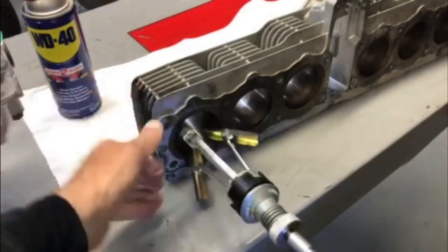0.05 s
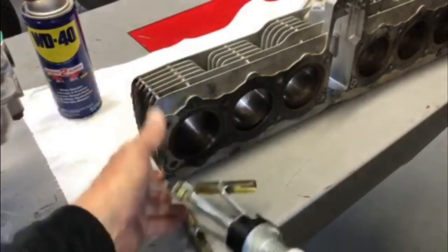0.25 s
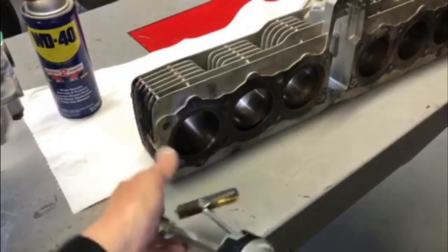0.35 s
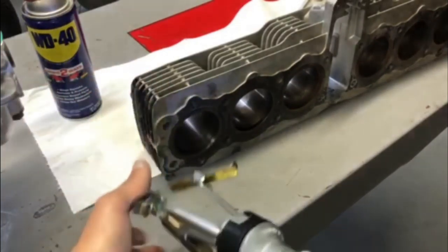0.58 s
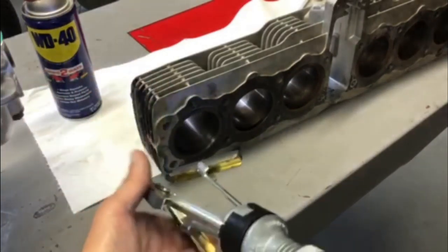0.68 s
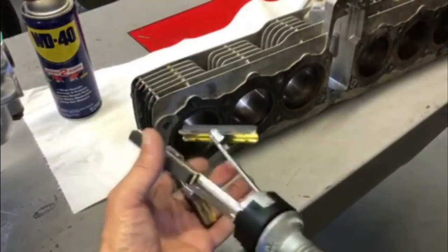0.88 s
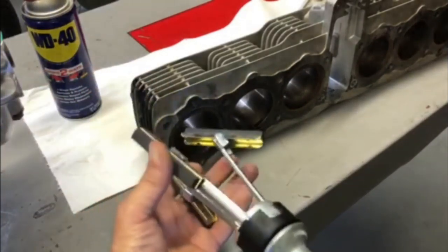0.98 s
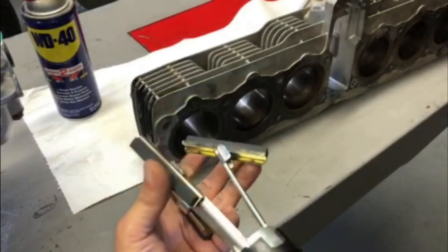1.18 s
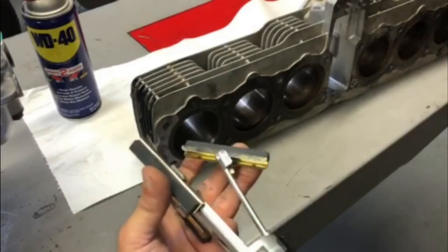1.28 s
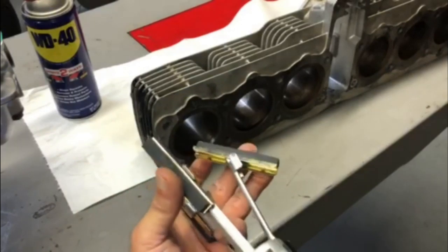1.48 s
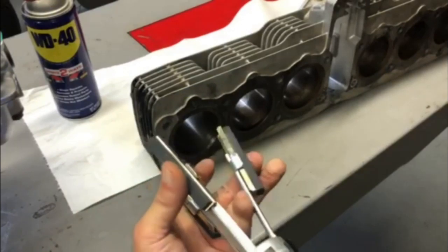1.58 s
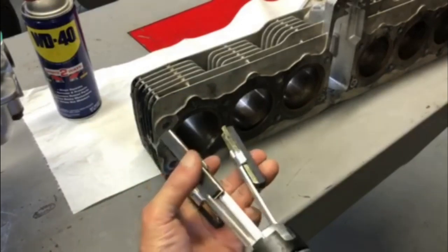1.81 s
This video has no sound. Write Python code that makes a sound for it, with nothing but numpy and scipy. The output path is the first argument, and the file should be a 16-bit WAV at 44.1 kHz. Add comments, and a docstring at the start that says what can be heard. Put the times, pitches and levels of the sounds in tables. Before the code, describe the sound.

Cylinder hone pulled from an engine block: short gritty scrape, quick knocks, one sharp ringing snap, then scattered light metal clicks and a late bright clack as a hand squeezes it, heard close in a hard-walled garage.

```python
"""In a garage, a three-armed cylinder hone is drawn out of an engine block. Its stones scrape (grainy noise
plus the bore's hollow tone), catch on the rim, and the spring snaps the arms open (bursts plus ringing metal).
A hand then squeezes them shut: the stone holders rattle (swells of grainy noise), tick on their pivots
and clack together. The ceiling and hard walls answer with a bounce and a fading tail of noise.
Underneath lie a low rumble, soft hiss and mains hum."""
import sys
import numpy as np
from scipy import signal
from scipy.fft import rfft, irfft, next_fast_len
from scipy.io import wavfile
from scipy.ndimage import uniform_filter1d

SR = 44100
rng = np.random.default_rng(int(sys.argv[2]) if len(sys.argv) > 2 else 0)


def int16_out(signal):
    """Quantize to a 16-bit WAV file."""
    q = np.round(np.clip(np.atleast_2d(signal).T, -1, 1) * 32767)
    wavfile.write(sys.argv[1], SR, q.astype(np.int16))


N = 81585  # length in samples

# Sliding out of the bore. Each row: time in seconds, level in dB before the final trim.
SLIDE_LEVEL = [(0, -67), (.045, -71), (.08, -60.5), (.11, -57), (.14, -51.5), (.165, -60), (.19, -78),
               (.22, -81.5)]
# Colour of stone on iron. Each row: pitch in Hz, relative strength in dB per Hz.
GRIT_COLOUR = [(200, -6.5), (600, 1), (1000, -1), (1400, -4.5), (2400, -7.5), (3500, -2.5), (4300, -13),
               (5400, 0), (7000, -8), (9700, -2), (10800, -15.5), (15500, -17.5)]
# Resonances of the air in the bore. Each row: pitch in Hz, width in Hz, relative strength in dB.
BORE_RESONANCES = [(750.7, 9, 7.5), (866, 95, -4.5), (927, 16, -11.5), (1474, 75, -14.5)]


def scrape(wet_db=-3):
    """Gritty stones slide along the bore and make the air inside it resonate."""
    t = np.arange(N) / SR
    level = amp(np.interp(t, *np.transpose(SLIDE_LEVEL), right=-120))
    loudest = level.max()

    def bore_response(f):
        response = 0
        for centre, width, db in BORE_RESONANCES:
            damping = 1j * f * width
            response = response + amp(db) * damping / (centre * centre - f * f + damping)
        return response

    air = unit(filtered(rng.standard_normal(N), bore_response))
    # a power below 1: the hollow tone swells less than the grit
    hollow = amp(-7) * loudest * (level / loudest) ** 0.56 * air
    still_sliding = t < SLIDE_LEVEL[-1][0]
    rub = level * grainy(GRIT_COLOUR, grain_db=2.5) + hollow * still_sliding
    return garage(rub, rub, wet_db) * amp(-2.5)


# Stones catch on the rim. Each row: start in seconds, level in dB before the final trim.
RIM_KNOCKS = [(.1948, -45.5), (.199, -43.5), (.207, -49.5), (.2165, -40.5)]
# Colour of a knock. Each row: pitch in Hz, relative strength in dB per Hz.
KNOCK_COLOUR = [(150, -26), (500, -12), (950, 3), (1300, -3), (1650, -12), (2300, -6), (3800, -10),
                (5000, -17), (9000, -18), (11000, -28), (16000, -34)]
# Ringing of the block. Each row: pitch in Hz, relative level in dB, seconds to fade by 60 dB.
BLOCK_MODES = [(895, -11, 0.3), (1100, -17.5, 0.31), (8990, -10.5, 0.34)]


def rim_knocks():
    """The stones trip over the rim, and each catch sets the block ringing."""
    knocks = strikes(RIM_KNOCKS, KNOCK_COLOUR, BLOCK_MODES,
                     hold_s=0.0013, release_s=.003, ring_db=-2, wet_db=-6)
    return amp(0.5) * knocks


# The arms hit their stop. Each row: start in seconds, level in dB.
ARM_SNAPS = [(.2214, -24), (.2275, -34.5)]
# Colour of a snap. Each row: pitch in Hz, relative strength in dB per Hz.
SNAP_COLOUR = [(100, -27.5), (250, -20.5), (500, -11.5), (900, -9), (1300, -2), (1750, -5.5), (2400, 1.5),
               (3400, 3.5), (4200, 1.5), (5800, 0), (7700, -2), (8700, -4), (9400, 0), (10000, -5.5),
               (10700, -15.5), (12600, -16.5), (16000, -26)]
# Ringing of the sprung frame. Each row: pitch in Hz, relative level in dB, seconds to fade by 60 dB.
FRAME_MODES = [(514, -33, .45), (902, -27, .3), (1078, -28, .4), (1307, -26, .45), (1378, -27, .5),
               (1723, -30, .4), (2213, -28, .4), (3335, -17, .2), (3470, -19, .18), (4368, -27, .3),
               (4712, -26, .3), (5180, -24, .3), (5625, -24, .28), (9228, -7, .08), (9340, 7, .012)]


def spring_open():
    """The spring throws the arms out against their stop, and the frame rings."""
    return strikes(ARM_SNAPS, SNAP_COLOUR, FRAME_MODES,
                   hold_s=0.0018, release_s=0.0021, ring_db=-7, wet_db=1.5)


# Loose holders jingle. Each row: middle in seconds, half length in seconds, level in dB.
RATTLE_SWELLS = [(.052, 0.0025, -59.5), (0.473, 0.0081, -52), (0.652, 0.03, -64), (0.674, 0.006, -60),
                 (0.81, 0.0097, -67), (0.846, 0.0052, -59), (1.579, 0.0077, -63)]
# Colour of the jingle. Each row: pitch in Hz, relative strength in dB per Hz.
RATTLE_COLOUR = [(500, -7.5), (2400, -9.5), (3200, -4.5), (4300, -7), (6000, -3.5), (7800, -9.5), (8800, 7),
                 (10200, -16.5), (12000, -17), (13800, -17), (16000, -23)]


def rattles(wet_db=-3):
    """The loose holders slide on their pins in short, soft swells of grainy noise."""
    t = np.arange(N) / SR
    swell = np.zeros(N)
    for middle, half, db in RATTLE_SWELLS:
        swell += amp(db) * np.exp(-((t - middle) / half) ** 2)
    jingle = swell * grainy(RATTLE_COLOUR, grain_db=6)
    return garage(jingle, jingle, wet_db)


# Stone holders knock on their pivots. Each row: start in seconds, level in dB before the final trim.
PIVOT_TICKS = [(.4673, -54), (.7412, -48.5), (.8498, -33), (1.0125, -45), (1.2265, -58), (1.536, -49)]
# Colour of a tick. Each row: pitch in Hz, relative strength in dB per Hz.
TICK_COLOUR = [(100, -42), (400, -33), (700, -20), (1300, -13), (1900, -21), (3000, -14), (3550, -3),
               (4100, -7), (6000, -1), (8000, -1), (9500, 0), (10500, -4), (12000, -14), (13700, -11),
               (16000, -19)]
# Ringing of a holder. Each row: pitch in Hz, relative level in dB, seconds to fade by 60 dB.
HOLDER_MODES = [(3510, 9, .015), (3580, -30, .2), (5523, -21, .25), (5992, -20, .25), (8840, -12, .17),
                (8950, -13, .28), (9150, -15, .15), (9550, -1, .018), (10440, -15, .14), (10760, -22, .2),
                (13550, -23, .14)]


def pivot_ticks():
    """Loose holders knock on their pivots and ring."""
    ticks = strikes(PIVOT_TICKS, TICK_COLOUR, HOLDER_MODES,
                    hold_s=0.0019, release_s=0.0038, ring_db=-3.5, wet_db=-7.0)
    return amp(-5) * ticks


# The stones close on each other. Each row: start in seconds, level in dB before the final trim.
STONE_CLACKS = [(1.5873, -27.5)]
# Colour of a clack. Each row: pitch in Hz, relative strength in dB per Hz.
CLACK_COLOUR = [(100, -38), (300, -25), (800, -16), (2000, -22), (2600, -17), (3600, -2), (4600, -11),
                (5500, 2), (7000, 0), (8500, 2), (9200, -10), (10600, -3), (12200, -9), (13000, -17),
                (16000, -20)]
# Ringing of a stone in its shoe. Each row: pitch in Hz, relative level in dB, seconds to fade by 60 dB.
STONE_MODES = [(2900, -29, .3), (3080, -27, .25), (5400, -22, .4), (5534, -22, .36), (5970, -21, .55),
               (6130, -22, .45), (6928, -22, .25), (8380, -5, .025), (8603, -22, .25), (10630, -27, .22),
               (12190, -25, .14)]


def stones_clack():
    """The stones clack shut and ring in their shoes."""
    clacks = strikes(STONE_CLACKS, CLACK_COLOUR, STONE_MODES,
                     hold_s=0.003, release_s=0.00092, ring_db=-1.5, wet_db=-7.5)
    return amp(-5) * clacks


def strikes(rows, colour, modes, hold_s, release_s, ring_db, wet_db):
    """Each contact is a brief metallic chatter that leaves the part's modes ringing."""
    out = np.zeros(N)
    t = np.arange(SR // 2) / SR
    click = causal(colour)
    # full force while held, then a quick fade
    contact = np.exp(-np.maximum(t - hold_s, 0) / release_s)
    force = np.linalg.norm(contact)
    for start, db in rows:
        chatter = rng.choice([-1, 1], len(t)) * contact
        ring = amp(ring_db) * ringing(modes, t)
        direct = signal.fftconvolve(chatter, click)[:len(t)] + ring
        # the room tail is fed by one click as strong as the whole chatter
        spread = force * np.pad(click, (0, len(t) - len(click))) + ring
        before = round(start * SR)
        direct = np.pad(direct, (before, N))[:N]
        spread = np.pad(spread, (before, N))[:N]
        out += amp(db) * garage(direct, spread, wet_db)
    return out


def ringing(modes, t):
    """Loose joints make each fading ring waver in pitch."""
    spread_hz_per_khz, changes_per_s = 11, 330
    out = np.zeros(len(t))
    for hz, db, t60 in modes:
        knots = rng.standard_normal(size=1024)
        waver = np.interp(t * changes_per_s, np.arange(len(knots)), knots)
        pitch = hz + spread_hz_per_khz * hz / 1000 * waver
        turns = np.cumsum(pitch) / SR + rng.random()
        out += amp(db - 60 * t / t60) * np.sin(2 * np.pi * turns)
    return out * (1 - np.exp(-t / 0.00021))  # soft start, in seconds


# How long the garage rings. Each row: pitch in Hz, seconds to fade by 60 dB.
ROOM_FADE = [(200, 0.91), (1200, 0.7543), (3500, 0.6948), (6000, 0.7043), (9000, .5), (14000, 0.48)]
# Colour of its tail. Each row: pitch in Hz, relative strength in dB.
ROOM_COLOUR = [(200, 10), (1200, 3), (3000, -2), (6000, 0.5), (9000, -2.5), (14000, 1.5)]


def garage(x, spread, wet_db):
    """The direct sound x, its bounce off the ceiling, and a diffuse tail fed by what spreads in all directions."""
    build_s, ceiling_s, ceiling_db = 0.0013, .0172, -11.5
    hz, t, z = signal.stft(rng.standard_normal(SR), SR, nperseg=256)
    fade = amp(-60 * t / along(ROOM_FADE, hz)[:, None])
    tail = signal.istft(z * fade, SR, nperseg=256)[1]
    tail *= 1 - np.exp(-np.arange(len(tail)) / SR / build_s)
    wash = signal.fftconvolve(spread, tail / np.linalg.norm(tail))[:N]
    wash = filtered(wash, lambda f: amp(1.5 + wet_db + along(ROOM_COLOUR, f)))
    # turning the phase with pitch delays the bounce
    bounce = filtered(x, lambda f: amp(ceiling_db) * np.exp(-2j * np.pi * f * ceiling_s))
    return x + wash + bounce


# Rumble while the tool is pulled out. Each row: time in seconds, level in dB (the last level stays).
RUMBLE_LEVEL = [(0, -51.5), (.15, -59), (.3, -57.5), (.6, -76)]
# Colour of the rumble. Each row: pitch in Hz, relative strength in dB per Hz.
RUMBLE_COLOUR = [(15, 5), (35, -2), (70, -22), (200, -32), (1000, -80.5)]


def rumble():
    """Deep noise that follows the pull and then sinks to a faint level."""
    t = np.arange(N) / SR
    return amp(np.interp(t, *np.transpose(RUMBLE_LEVEL))) * noise(RUMBLE_COLOUR)


# Colour of the still air. Each row: pitch in Hz, relative strength in dB per Hz.
AIR_COLOUR = [(15, 12), (35, 1), (70, -7), (100, -12), (170, -11), (250, -19), (315, -16), (355, -8),
              (400, -15), (520, -22), (1000, -27), (2200, -27), (5000, -29), (9000, -37), (15500, -44)]


def still_air():
    """A steady bed of noise, strongest in the bass, with a soft hiss."""
    return amp(-61.5) * noise(AIR_COLOUR)


# Mains hum. Each row: pitch in Hz, level in dB.
HUM_TONES = [(59.5, -78), (119.5, -79)]


def mains_hum():
    """Steady low sine tones."""
    t = np.arange(N) / SR
    hum = np.zeros(N)
    for hz, db in HUM_TONES:
        # the square root of 2 turns an rms level into a peak
        hum += amp(db) * np.sqrt(2) * np.sin(2 * np.pi * (hz * t + rng.random()))
    return hum


def grainy(spectrum, grain_db):
    """Friction noise of rms 1, broken into millisecond grains."""
    grains = unit(uniform_filter1d(rng.standard_normal(N), size=60))
    return unit(noise(spectrum) * amp(grain_db * grains))


def noise(spectrum):
    """Coloured noise of rms 1."""
    return unit(filtered(rng.standard_normal(N), lambda hz: amp(along(spectrum, hz))))


def causal(spectrum, size=2048):
    """A click of energy 1 with the given colour, its energy packed at the start (minimum phase)."""
    cepstrum = irfft(np.log(amp(along(spectrum, np.fft.rfftfreq(size, 1 / SR)))))
    # fold the backward half onto the forward half
    cepstrum[1:size // 2] *= 2
    cepstrum[size // 2 + 1:] = 0
    click = irfft(np.exp(rfft(cepstrum)))
    return click / np.linalg.norm(click)


def filtered(x, response):
    """x times a response of frequency."""
    m = next_fast_len(N + SR // 2)
    return irfft(rfft(x, m) * response(np.fft.rfftfreq(m, 1 / SR)), m)[:N]


def along(points, hz):
    """Read (Hz, value) points on a log axis."""
    f, v = np.transpose(points)
    return np.interp(np.log(hz + 1), np.log(f + 1), v)


def amp(db):
    """Turn dB into a plain multiplier."""
    return 10 ** (np.asarray(db) / 20)


def unit(x):
    """Scale x to rms 1."""
    return x / np.sqrt(np.mean(x ** 2) + 1e-20)


def scene():
    """The tool's sounds over the quiet garage, as one channel."""
    tool = scrape() + rim_knocks() + spring_open() + rattles() + pivot_ticks() + stones_clack()
    background = rumble() + still_air() + mains_hum()
    return (tool + background)[None]


def record(dry):
    """Nothing is kept from 15800 Hz upwards."""
    return filtered(dry[0], lambda hz: hz < 15800)[None]


dry = scene()
out = record(dry)
int16_out(out)
```